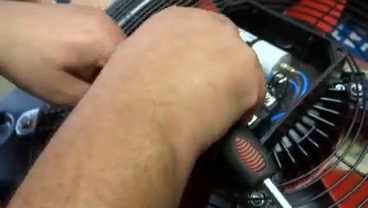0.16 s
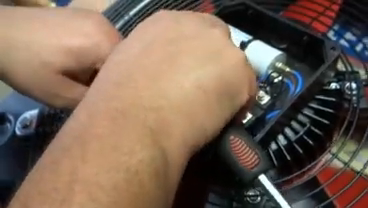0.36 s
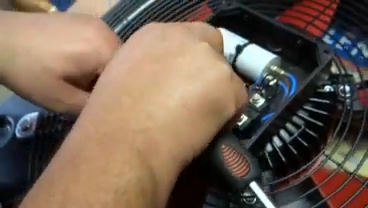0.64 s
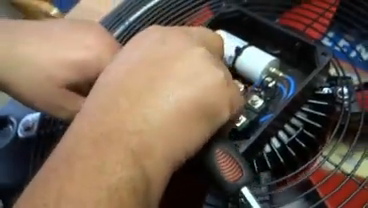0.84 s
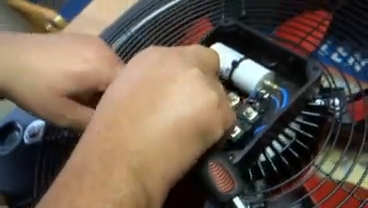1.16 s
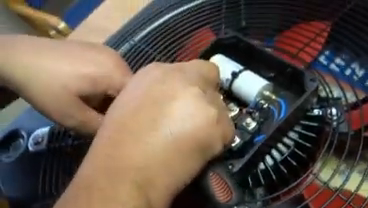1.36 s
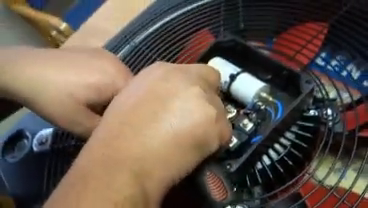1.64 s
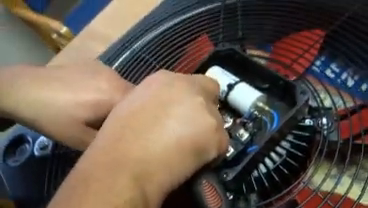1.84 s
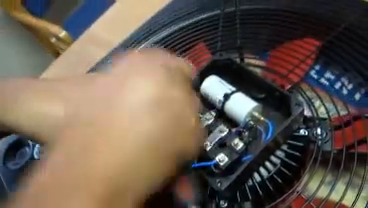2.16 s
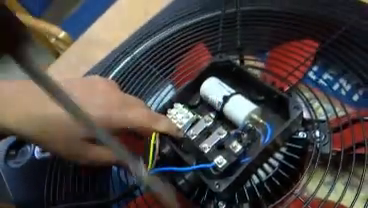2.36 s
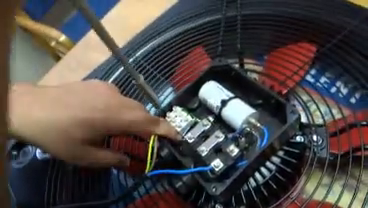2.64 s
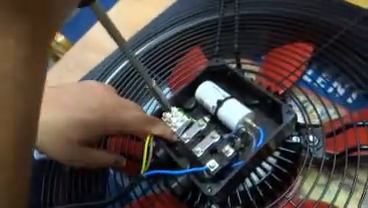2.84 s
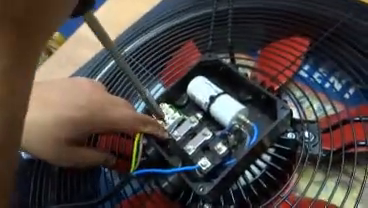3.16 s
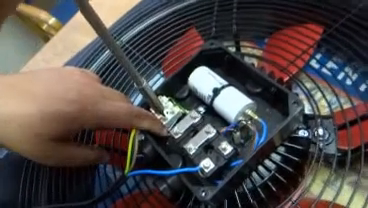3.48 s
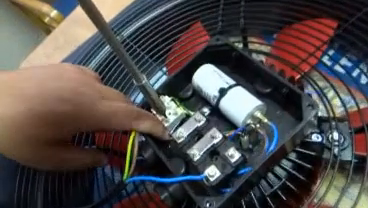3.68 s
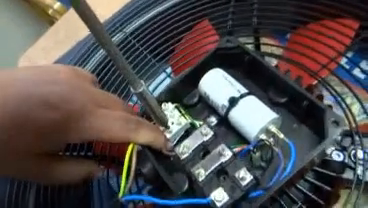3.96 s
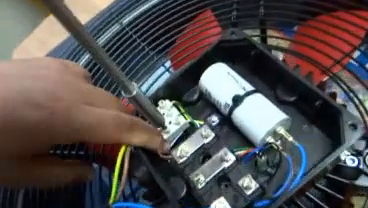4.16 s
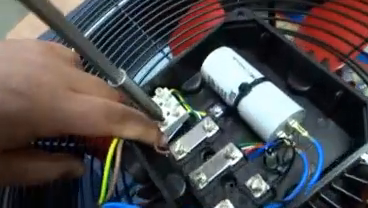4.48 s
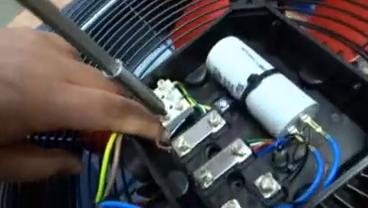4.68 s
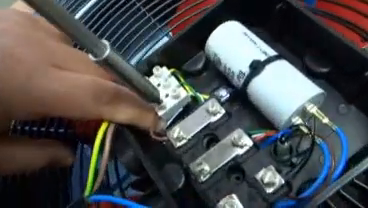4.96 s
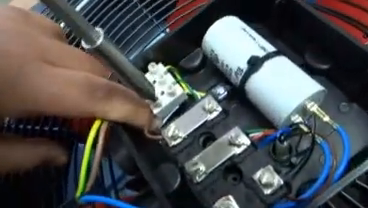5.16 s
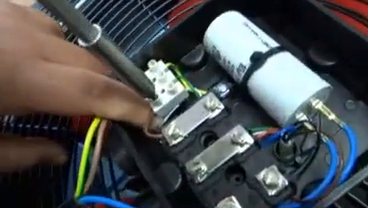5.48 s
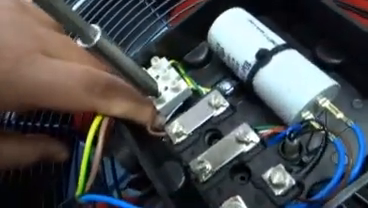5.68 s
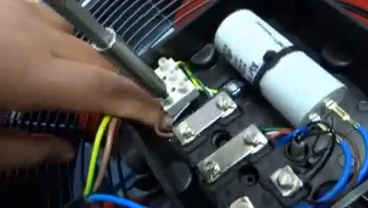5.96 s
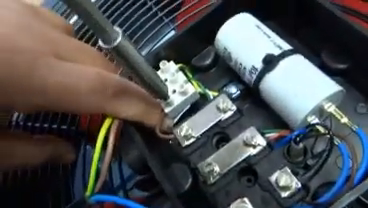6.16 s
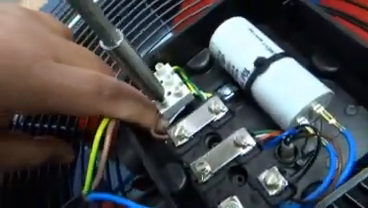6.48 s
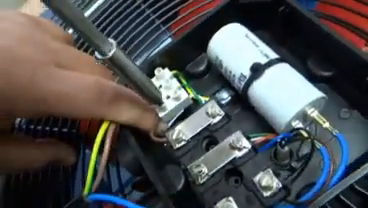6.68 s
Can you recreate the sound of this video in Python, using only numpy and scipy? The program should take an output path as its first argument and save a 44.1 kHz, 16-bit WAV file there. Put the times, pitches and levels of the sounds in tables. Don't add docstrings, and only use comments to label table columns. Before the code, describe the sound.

A screwdriver ticks, jumps out of a screw twice with loud clacks, then grinds and clicks in short turns above low steady machine rumble.

```python
import sys
import numpy as np
from scipy import signal
from scipy.fft import rfft, irfft, next_fast_len
from scipy.io import wavfile
from scipy.ndimage import uniform_filter1d

SR = 44100
rng = np.random.default_rng(int(sys.argv[2]) if len(sys.argv) > 2 else 0)


def attenuation_scalar(level_db):
    decades = np.asarray(level_db, float) / 20
    return 10 ** decades


def pcm_store(signal):
    levels = np.round(np.clip(np.atleast_2d(signal), -1, 1) * 32767)
    wavfile.write(sys.argv[1], SR, levels.astype(np.int16).T)


N = 300762

# start in seconds, peak in dB, brightest Hz, room tail in dB.
WIRE_TICKS = [(0.6949, -32.5, 7541, -5.5), (0.835, -53, 6500, -3), (1.0363, -36.5, 7974, -9),
              (1.0585, -49, 2002, -7.5), (1.013, -51.5, 1785, -6), (0.541, -53, 2193, 3),
              (1.354, -36.5, 9535, -13.5), (1.503, -44.5, 4973, -7), (1.555, -48, 4600, -9),
              (1.7874, -36.5, 9765, -7), (1.806, -41, 6100, -5), (1.8955, -40, 10250, -8.5),
              (1.9913, -38, 6204, -13), (2.0094, -47, 3200, -14), (2.144, -41.5, 9100, -0.5)]
# start in seconds, peak in dB, brightest Hz, room tail in dB.
SEAT_TICKS = [(3.1337, -41, 4300, -5.5), (3.136, -44.5, 2440, -9.5), (3.438, -54.5, 3400, -5),
              (3.451, -40, 3472, -9), (3.7141, -53, 3383, -6), (3.7135, -53, 7600, -15),
              (3.692, -49.5, 8600, -10), (3.785, -36, 8474, 0.5), (3.7945, -47, 6440, -1),
              (3.8626, -35, 3500, -6.5), (3.8646, -22, 4973, -1), (3.878, -16, 5161, -16),
              (3.8883, -23, 6329, -22), (3.896, -32.5, 5140, -17), (4.1361, -31, 8255, -10),
              (4.2362, -33, 3150, -8.5), (4.365, -31, 3830, -2.5), (4.3755, -26, 3950, -20),
              (4.391, -31, 7400, 0.5), (4.39, -37, 3800, -7), (4.5129, -32.5, 8600, -17),
              (4.5162, -36, 3800, -13), (4.5264, -36.5, 6540, -5.5)]
# start in seconds, peak in dB, brightest Hz, room tail in dB.
TURN_TICKS = [(4.7546, -45, 6600, -7.5), (4.8518, -30, 4728, -3), (4.8542, -26.5, 7800, -15.5),
              (4.8605, -28, 8034, -15), (4.9045, -29, 8300, -8), (4.9126, -29.5, 7771, -15),
              (4.9152, -28, 8600, -10), (4.948, -39, 8600, -7), (5.074, -41, 7883, 6.5),
              (5.192, -34.5, 3173, -1), (5.2032, -32.5, 8531, 1), (5.2255, -42.5, 6000, -15),
              (5.268, -38, 6604, -12), (5.546, -44, 7200, 11.5), (5.83, -51.5, 3100, -8),
              (5.8388, -30.5, 6530, -6), (5.8475, -31.5, 7162, -10.5), (5.857, -44, 4300, -12.5),
              (6.0377, -41.5, 9000, 4.5), (6.088, -45, 4016, 4), (6.1572, -31.5, 7700, -4.5),
              (6.1615, -41, 3060, -12), (6.179, -37, 4500, 1.5), (6.3625, -58.5, 8153, -12),
              (6.379, -32, 6690, -6), (6.4675, -46, 4900, -15), (6.4745, -32.5, 4783, -7),
              (6.4956, -38, 4540, -22), (6.5078, -31, 7046, -7), (6.5415, -47, 8000, -10),
              (6.6193, -52, 8110, 14.5), (6.794, -48, 4970, -9), (6.804, -51, 4980, -9)]
# frequency in Hz, width in Hz, level in dB.
SCREW, BLADE, TIP = [(2300, 590, 1), (3331.3, 1096, -9.5), (3737.5, 710, 1.5)], [(4700, 580, -10), (6100.4, 1004, -10.5)], [(6600, 1725, -1), (8600, 3300, 7), (10637, 4105, 1)]
# frequency in Hz, width in Hz, level in dB.
CLAMPED = [
    [(2200, 500, -13), (3180, 380, 0), (3950, 300, -9)],
    [(4720, 520, 0), (5300, 300, -4), (6200, 450, -9)],
    [(7170, 650, 0), (8600, 1000, 1), (10100, 1800, -3)],
]
TICK_MS, TICK_OCTAVES = 1.9, .68
BITE_MS, BITE_OCTAVES = .55, .95
REBOUND_MS, REBOUND_DB = 2.3, -9
LIGHT_DB, MS_PER_DB = -40, .11
RISE_MS, RISE_MS_PER_DB = 0.596, 1
FIRM_DB, OCTAVES_PER_DB = -30, .04

# start in seconds, length in seconds, level in dB, half of tip over screw in
# dB.
FUMBLES = [(0.987, 0.091, -74, -1), (1.08, 0.03, -74.5, 12), (1.32, 0.075, -73, 3),
           (1.495, 0.091, -70.5, 0), (1.752, 0.0608, -70, 6.5), (1.889, 0.0705, -65.5, 4.5),
           (1.93, 0.1252, -65.5, 3), (2.018, 0.3142, -70.5, 1.5), (2.294, 0.23, -72.5, 2),
           (2.5, 0.25, -73.5, 1), (3.435, 0.03398, -63, 0.5), (3.582, 0.4305, -66.5, -1),
           (3.7, 0.032, -75.5, 4.5), (3.786, 0.0322, -65.5, 11), (3.85, 0.023, -54, -1),
           (3.883, 0.027, -43.5, 2.5), (3.897, 0.067, -70.5, -4), (4.033, 0.22, -67.5, -0.5),
           (4.185, 0.2, -70.5, -1), (4.343, 0.022, -57.5, 2), (4.362, 0.028, -47, 5.5),
           (4.378, 0.0776, -73, 5), (4.51, 0.017, -55, 1.5)]
# start in seconds, length in seconds, level in dB, half of tip over
# screw in dB, blade in dB.
TURNS = [(4.748, 0.0422, -64.5, 5.5, 3), (4.83, 0.043, -64, 4, 0), (4.88, 0.0542, -62, 5.5, -1.5),
         (4.93, 0.02322, -54.5, 8, -7.5), (4.96, 0.058, -68, 4, -2.5), (5.064, 0.1912, -73, 1.5, -1),
         (5.193, 0.03205, -60, 2.5, 3), (5.22, 0.06042, -58.5, 8.5, 1), (5.285, 0.02462, -63.5, 6, -3),
         (5.34, 0.36, -71.5, 4, -2.5), (5.538, 0.06, -60, -0.5, -4.5), (5.61, 0.12, -81, -3, 0),
         (5.74, 0.0803, -73.5, 4, 2.5), (5.823, 0.04099, -57.5, 2, 1.5), (5.89, 0.06203, -66.5, 6, 2),
         (5.96, 0.049, -75, 8, 7), (6.03, 0.02448, -71.5, 9, -2), (6.07, 0.04793, -70, 8.5, 1),
         (6.14, 0.01846, -66, 4.5, 4), (6.158, 0.03, -58, -2, 0), (6.205, 0.05852, -64, 8, -2.5),
         (6.3, 0.036, -66, 5.5, -0.5), (6.36, 0.048, -68, 6, -0.5), (6.452, 0.0392, -63.5, 3, 2),
         (6.484, 0.0251, -58.5, 1, 6), (6.51, .025, -69, 8, -1), (6.535, 0.033, -65, 9, -6.5),
         (6.6, 0.0377, -65.5, 4.5, -8), (6.71, 0.069, -67, 4.5, -4), (6.785, 0.16, -59.5, 2, 2.5)]
LOOSE_BLADE_DB = -3.5
LOOSE_PEAKY_DB, LOOSE_WIDEN = 0.37, 1.4574
LOADED_PEAKY_DB, LOADED_WIDEN = 2.8, 1.6
WANDER, WANDER_S = .07, .06

# start in seconds, contact length in seconds, rms in dB.
CLACKS = [
    (3.8615, 0.00703, -28.5),
    (3.8758, 0.0053, -24.5),
    (4.3729, 0.0059, -24.5),
]
# frequency in Hz, width in Hz, level in dB.
SHAFT = [
    [(2481, 290, -9), (3865.4, 230, -5), (5030, 280, 1), (5830, 240, -11), (7205, 270, -12),
     (7550, 220, -14), (8782, 310, 1)],
    [(3396.5, 140, -9), (3800, 150, -3), (4818.3, 390, 0), (4966.5, 48, -6), (5816.8, 300, -6),
     (6400, 340, -3.5), (7835, 180, -1), (8510, 230, 0), (9600, 190, 1), (11000, 420, -1), (11500, 80, -28),
     (11800, 130, -27)],
    [(2470, 150, -11), (3810, 250, 3), (5140, 150, -8.5), (5690, 80, -14), (6160, 170, -3.5),
     (6940, 190, -11.5), (7530, 240, -5), (9000, 140, -6), (9455, 120, -17), (9844, 200, -9.5)],
]
CHATTER_DB = 4

# start in seconds, length in seconds, first Hz, last Hz, top level in dB.
SQUEALS = [(.44, .175, 6830, 6900, -73), (3.68, .132, 5960, 6030, -57), (4.05, .14, 6200, 6150, -63),
           (3.81, .045, 5700, 5610, -64), (4.172, .026, 5490, 5440, -59), (3.668, .115, 10120, 10000, -68),
           (3.775, .05, 9980, 10400, -69), (3.82, .04, 10400, 10230, -70), (3.535, .13, 9600, 11700, -75),
           (3.605, .065, 8500, 9500, -73), (4.148, .03, 5530, 5500, -70)]
SQUEAL_ENDS_DB = -6
SAG_HZ_PER_DB, QUIET_DB = 8.5, -73

# start in seconds, peak in dB, room tail in dB.
BUMPS = [(0.835, -46, -15), (1.353, -45, -5), (1.5036, -46, -7.5), (1.554, -50.5, -3), (1.65, -57, -12),
         (1.807, -48.5, -7), (2.234, -51, -20), (3.862, -38.5, 5.5), (3.878, -29.5, -4), (3.898, -33, -17),
         (4.237, -43, -9.5), (4.365, -31, -1.5), (4.375, -30.5, -10), (4.853, -41.5, -4), (5.846, -48, 1.5),
         (6.098, -50, -26.5), (6.161, -55, 9), (6.473, -45.5, -5)]
# frequency in Hz, width in Hz, level in dB.
BOX = [(568.18, 130, -0.5), (750, 296, 0), (1044, 51.96, -5), (1704.5, 233, -16.5), (1959.9, 93.2, -8.5)]
BUMP_MS, BUMP_OCTAVES = 2.4, 1.6
LID_HZ, LID_SCATTER = 612, 0.15
# start in seconds, level in dB, upper modes in dB.
LID_BLOWS = [
    (3.8775, -32.5, -5),
    (3.898, -41, -11),
    (4.3648, -32, 1),
    (4.3755, -34.5, -2),
    (4.2365, -48, 7.5),
]
# frequency in Hz, level in dB, 60 dB decay in seconds.
LID = [(563, -4.5, .06), (640, -0.5, .05), (778, -2, .045), (1156, -6.5, .06), (1380, -11.5, .14)]
# start in seconds, length in seconds, level in dB, slips per second.
RUBS = [(0.978, 0.12696, -66.5, 870), (1.133, 0.65, -73.5, 600), (1.487, 0.1409, -73, 602.3),
        (1.905, 0.02, -70, 220), (1.943, 0.054, -56, 830), (2.003, 0.21, -71, 627.3),
        (2.13, 0.3391, -75.5, 961.3), (3.621, 0.2523, -66.5, 1980), (3.9, 0.77, -65.5, 2200),
        (4.376, 0.3788, -71, 3300), (4.557, 0.2678, -74, 1200), (4.954, 0.13, -70, 1182.6),
        (5.199, 0.14127, -66.5, 1870), (6.646, 0.1604, -67, 1520)]
# start in seconds, level in dB.
JERKS = [(1.0343, -57.5), (1.058, -46), (1.068, -53), (1.5025, -43), (1.5114, -38.5), (1.5251, -42),
         (1.5546, -37.5), (1.5627, -43), (1.5684, -38.5), (1.5732, -50), (1.6143, -56), (1.6189, -49),
         (1.6255, -46), (1.6335, -37.5), (1.6488, -41.5), (1.9222, -42), (1.9451, -39), (1.9509, -38.5),
         (1.9566, -38), (1.9623, -34.5), (1.9675, -42), (1.9733, -34.5), (1.9798, -34.5), (1.987, -35),
         (1.9939, -34.5), (2.0038, -46), (2.0095, -33.5)]
JERK_DB = 11.5

KNOCK_S = [3.8805, 4.237, 4.376, 4.852, 3.135, 4.43]
# deep modes in dB, upper modes in dB, ring length factor.
KNOCKS = [
    (-26, -25.5, 1.22),
    (-41, -41, 0.617),
    (-23.5, -30.5, 1.26),
    (-43.5, -42.5, 2.2),
    (-42, -52, 1.105),
    (-41, -48, 0.47),
]
# frequency in Hz, level in dB, 60 dB decay in seconds.
CAGE = [(55.2, -1.5, 1), (104.69, -5, 1.0), (121.7, -0.5, 0.82), (149.5, -6, 0.99), (152, 10.5, 0.039),
        (625, -11.5, 0.3), (185.5, 3.5, 0.25), (250.5, 1.5, 0.29), (292, -9, 0.65), (559, -12, 0.038),
        (592, -19, 0.4), (708.6, -16.5, 0.18)]

# frequency in Hz, level in dB per Hz.
AIR = [(15, -40), (25, -7.5), (126, -1), (190, -2), (266, -5.5), (294, -6.5), (401, -9.5), (468, -20),
       (574, -16.5), (936, -25.5), (1090, -24.5), (1450, -33), (1920, -32), (6260, -39.5), (11600, -42.5),
       (15100, -102), (22000, -120)]
AIR_DB = -47
# frequency in Hz, correlation.
SAME = [(30, 1), (140, 1), (350, 0.85856), (840, 0.056), (2000, 0.1456), (4900, 0.62), (9000, 1),
        (11700, 0.9871)]
# frequency in Hz, width in Hz, level in dB.
HUM = [(61.62, 10, -79.5), (104.5, 23.4, -54.5), (330.22, 2.8, -63), (571.93, 9.106, -73.5),
       (1059.3, 89, -75), (9132.3, 1700, -76)]
MOTOR_HZ = 296.6
# time in seconds, level in dB.
MOTOR = [(0, -55), (0.8, -50.5), (1.5, -53), (2.4, -52.5), (3.4, -55), (4.2, -60.5), (5.2, -57),
         (6.002, -56), (6.82, -55)]

# frequency in Hz, 60 dB decay in seconds.
ROOM = [(200, 1), (700, 0.66), (2000, 0.8546), (5000, 0.5299), (10000, 0.3312)]
CLACK_ROOM_DB, STROKE_ROOM_DB = -24, -10
# frequency in Hz, gain in dB.
SHADE = [(28, -23.5), (75, 5), (300, 5.5), (9200, 0.5), (10200, -3.5), (11000, -8), (11800, -11),
         (12300, -32)]
# frequency in Hz, lead of the left in radians.
PORTS = [(0, 0.78), (1120, -0.47), (1720, -0.6), (4220, -0.451), (8440, -0.0625), (9820, -0.86),
         (11900, 0.15)]
# frequency in Hz, gain in dB.
MIC = [(12, -31.5), (22, 6), (40, -2), (11700, -1.5), (12100, -33), (12400, -55)]
TOP_BANDS_HZ, TOP_FLUTTER_DB, DROPPED_PERCENT = (11050, 11500), 1.6, (20, 34)


def ticks():
    return contacts(WIRE_TICKS + SEAT_TICKS, SCREW + BLADE + TIP, -6, 1, TICK_MS, TICK_OCTAVES, .045)


def bites():
    dry, sent = contacts(TURN_TICKS, sum(CLAMPED, []), -6, 1, BITE_MS, BITE_OCTAVES, .06, skid=.1)
    rebound = np.roll(dry, round(REBOUND_MS * SR / 1000), 1)
    return dry + attenuation_scalar(REBOUND_DB) * rebound, sent


def contacts(events, modes, peaky_db, aside, light_ms, light_octaves, damping, skid=1):
    dry, sent = np.zeros((2, N)), np.zeros((2, N))
    t, hz = np.arange(1024) / SR, np.fft.rfftfreq(1024, 1 / SR)
    body = 1.95 + sum(attenuation_scalar(db) / (1 + (2 * (hz - f) / w) ** 2) for f, w, db in modes)
    chance = rng.standard_normal((len(events), 2, 1024))
    for (s, db, top_hz, tail_db), (noise, uneven) in zip(events, chance):
        ms = light_ms + skid * MS_PER_DB * (db - LIGHT_DB)
        octaves = light_octaves + OCTAVES_PER_DB * max(db - FIRM_DB, 0)
        rise_s = max(RISE_MS + skid * RISE_MS_PER_DB * (db - LIGHT_DB), .2) / 1000
        rise = np.clip((t - .002) / rise_s, 0, 1)
        u = (t - .002) / (np.clip(ms, .5, 9) / 1000)
        fall = np.exp(-np.clip(u, 0, 9) ** 1.53 * 0.95)
        burst = noise * attenuation_scalar(5.112 * uneven) * rise * fall
        distance = abs(np.log2((hz + 1) / top_hz) / np.clip(octaves, .1, 2))
        hump = body * np.exp(-.5 * distance ** 2.4)
        wide = irfft(rfft(burst) * hump)
        main_mode = resonate(burst, top_hz, damping * top_hz)
        sound = evened(wide) + attenuation_scalar(peaky_db) * evened(main_mode)
        peak = abs(sound).max()
        add(dry, s - .002 - .001 * skid, panned(attenuation_scalar(db) * sound / peak, aside * hand_pan(s)))
        snap = np.roll(irfft(hump ** 2), 200)
        energy = np.linalg.norm(sound) / peak / np.linalg.norm(snap)
        add(sent, s - .003, panned(attenuation_scalar(db + tail_db) * energy * snap, 0))
    return dry, sent


def grinding(strokes, parts, peaky_db, widen):
    size = attenuation_scalar(peaky_db * np.minimum(rng.exponential(1, N), 4))
    slips = size * rng.standard_normal(N) * (rng.random(N) < 7000 / SR)
    judder = attenuation_scalar(0.63 * evened(uniform_filter1d(rng.standard_normal((3, N)), 260)))
    power = np.zeros((3, N))
    for s, length, db, tilt_db, blade_db in strokes:
        at, shape = swell(s, length)
        level = attenuation_scalar(db + np.array([-tilt_db, blade_db, tilt_db]))
        power[:, at] += (level[:, None] * shape) ** 2
    sound = sum(np.sqrt(p) * ring(slips * j, modes, widen) for p, j, modes in zip(power, judder, parts))
    return panned(sound, hand_pan(np.arange(N) / SR))


def ring(slips, modes, widen):
    slow = rng.standard_normal((2, len(modes), N // 100 + 2))
    rocking = attenuation_scalar(2.4 * evened(uniform_filter1d(uniform_filter1d(slow[0], 4), 4)))
    span = round(WANDER_S * SR / 100)
    drift = 1 + WANDER * evened(uniform_filter1d(uniform_filter1d(slow[1], span), span))
    own = rng.choice([-1., 1.], (len(modes), N)) * (rng.random((len(modes), N)) < .6)
    out, at = np.zeros(N), np.arange(N) / 100
    for (f, w, db), g, d, o in zip(modes, rocking, drift, own):
        mode_hz = f * np.interp(at, np.arange(len(d)), d)
        turn = np.exp(2j * np.pi * np.cumsum(mode_hz) / SR)
        r = np.exp(-np.pi * widen * w / SR)
        base = signal.lfilter([(1 - r) ** 2], [1, -2 * r, r * r], slips * o * turn.conj())
        gain = np.interp(at, np.arange(len(g)), g) * attenuation_scalar(db)
        out += gain * (turn * base).real
    return evened(out)


def swell(s, length):
    at = np.arange(round(s * SR), min(round((s + 1.4 * length) * SR), N))
    u = (at / SR - s) / length
    return at, np.clip(u / 0.21043, 0, 1) * np.clip((1.3 - u) / .5, 0, 1)


def clacks():
    out = np.zeros((2, N))
    for (s, length, db), modes in zip(CLACKS, SHAFT):
        t = np.arange(0, length, 1 / SR)
        tone = np.zeros(len(t))
        for f, _, mode_db in modes:
            chatter = evened(uniform_filter1d(rng.standard_normal(len(t)), size=40))
            tone += attenuation_scalar(mode_db + CHATTER_DB * chatter) * np.sin(2 * np.pi * (f * t + rng.random()))
        shape = np.sin(np.pi * (t / length) ** 0.92) ** 1.25
        add(out, s, panned(attenuation_scalar(db) * evened(tone) * shape, hand_pan(s)))
    return out


def squeals():
    out = np.zeros((2, N))
    tremble = evened(uniform_filter1d(rng.standard_normal((2, N)), 250))
    for s, length, first_hz, last_hz, top_db in SQUEALS:
        u = np.arange(0, length, 1 / SR) / length
        pitch, shake = tremble[:, round(s * SR):][:, :len(u)]
        sag_hz = SAG_HZ_PER_DB * max(top_db - QUIET_DB, 0) * abs(2 * u - 1) ** 2.4
        glide_hz = first_hz + (last_hz - first_hz) * u + sag_hz
        tone = np.sin(2 * np.pi * np.cumsum(glide_hz * (1 + 0.002 * pitch)) / SR)
        level = np.sqrt(2) * attenuation_scalar(top_db + SQUEAL_ENDS_DB * (2 * u - 1) ** 2 + 1.545 * shake)
        add(out, s, panned(tone * level * signal.windows.tukey(len(u), .15), 0.6))
    return out


def bumps():
    spots_hz = LID_HZ * (1 + LID_SCATTER * rng.uniform(-0.83, 1, len(BUMPS)))
    events = [(s, db, hz, tail_db) for (s, db, tail_db), hz in zip(BUMPS, spots_hz)]
    return contacts(events, BOX, 0.62, -0.521, BUMP_MS, BUMP_OCTAVES, 0.1)


def lid():
    out, t = np.zeros((2, N)), np.arange(SR // 4) / SR
    for s, db, upper_db in LID_BLOWS:
        modes = sum(attenuation_scalar(d + upper_db * (f > 1000) - 60 * t / t60) * np.sin(2 * np.pi * f * t)
                    for f, d, t60 in LID)
        add(out, s, panned(attenuation_scalar(db) * modes, 0))
    return out


def rubbing():
    slips, size = np.zeros(N), attenuation_scalar(5.77 * rng.standard_normal(N))
    unsteady = attenuation_scalar(1.6 * evened(uniform_filter1d(rng.standard_normal(N), 150)))
    for s, length, db, per_s in RUBS:
        at, shape = swell(s, length)
        count = np.floor(np.cumsum(per_s * unsteady[at]) / SR)
        slip_now = np.diff(count, prepend=0) > 0
        slips[at] -= attenuation_scalar(db) * shape * size[at] * slip_now * np.sqrt(SR / per_s)
    for s, db in JERKS:
        slips[round(s * SR)] -= attenuation_scalar(db + JERK_DB)
    slips -= uniform_filter1d(slips, 120)
    plate = sum(attenuation_scalar(db) * resonate(slips, f, w) for f, w, db in BOX)
    soft_plastic = signal.butter(N=4, Wn=2000, fs=SR, output="sos")
    return panned(attenuation_scalar(14.0) * signal.sosfilt(soft_plastic, plate), -.5)


def cage():
    out, t = np.zeros((2, N)), np.arange(SR) / SR
    for s, (deep_db, upper_db, longer) in zip(KNOCK_S, KNOCKS):
        ringing = np.zeros(SR)
        for f, db, t60 in CAGE:
            level = attenuation_scalar(db + (deep_db if f < 160 else upper_db) - 60 * t / (t60 * longer))
            ringing += level * np.sin(2 * np.pi * f * t) * (1 - .5 * np.exp(-t * f / 70.7))
        add(out, s, panned(attenuation_scalar(-6.5) * ringing, 0))
    rattle = evened(uniform_filter1d(uniform_filter1d(rng.standard_normal(N), 700), 700))
    return out * attenuation_scalar(2.2 * rattle)


def room(x):
    taps = np.zeros((2, SR))
    at = np.arange(250, SR - 20, 20)
    at = at + rng.integers(0, 20, (2, len(at)))
    np.put_along_axis(taps, at, rng.choice([-1., 1.], at.shape), 1)
    taps[1] = 1.0056 * taps[0] + 0.4903 * taps[1]
    hz, t, z = signal.stft(taps, SR, nperseg=256)
    tail = signal.istft(z * attenuation_scalar(-60 * t / read(ROOM, hz)[:, None]), SR, nperseg=256)[1]
    tail = tail / np.linalg.norm(tail, axis=1)[:, None]
    return signal.fftconvolve(x.mean(0)[None], tail, axes=1)[:, :N]


def workshop():
    frames, hz = N // 512 + 5, np.fft.rfftfreq(2048, 1 / SR)
    a, b, c, d, patches = rng.standard_normal((frames, 1025, 5)).T
    patches = evened(uniform_filter1d(uniform_filter1d(patches, 20, 0), 8, 1))
    same = np.clip(read(SAME, hz), -1, .992)[:, None]
    left = a + 1j * b
    right = same * left + np.sqrt(1 - same ** 2) * (c + 1j * d)
    z = np.array([left, right]) * attenuation_scalar(read(AIR, hz)[:, None] + 1.4 * patches)
    air = attenuation_scalar(AIR_DB) * evened(signal.istft(z, nperseg=2048, noverlap=1536)[1][:, :N])
    shake = rng.standard_normal(N + SR)
    drift = evened(resonate(shake, 0.29, 0.9125)[SR:])
    motor_level = np.sqrt(2) * attenuation_scalar(np.interp(np.arange(N) / SR, *np.transpose(MOTOR)))
    motor = motor_level * np.sin(2 * np.pi * np.cumsum(MOTOR_HZ + 0.65528 * drift) / SR)
    hum = sum(attenuation_scalar(db) * evened(resonate(resonate(shake, f, w), f, w)[SR:]) for f, w, db in HUM)
    return air + motor + hum


def evened(x):
    return x / np.sqrt(np.mean(x ** 2) + 1e-20)


def read(points, hz):
    f, value = np.transpose(points)
    return np.interp(np.log(hz + 1), np.log(f + 1), value)


def add(mix, s, sound):
    part = mix[:, round(s * SR):][:, :sound.shape[1]]
    part += sound[:, :part.shape[1]]


def panned(x, pan_db):
    return np.array([x * attenuation_scalar(pan_db / 2), x * attenuation_scalar(-pan_db / 2)])


def hand_pan(s):
    return np.interp(s, [2.5, 3.2, 4.7], [-.2, 1.2, 3.5])


def resonate(x, hz, width):
    pole = np.exp((2j * np.pi * hz - np.pi * width) / SR)
    return 2 * signal.lfilter([1 - abs(pole)], [1, -pole], x).real


def colour(x, points, lead=((1, 0), (2, 0))):
    size = next_fast_len(N + 4096)
    hz = np.fft.rfftfreq(size, 1 / SR)
    turn = np.exp(.5j * read(lead, hz))
    return irfft(rfft(x, size) * attenuation_scalar(read(points, hz)) * np.array([turn, 1 / turn]), size)[:, :N]


def narrowed(x):
    hz, t, z = signal.stft(x, SR, nperseg=2048, noverlap=1024)
    power = (abs(z) ** 2).mean(0) + 1e-20
    top = power[hz > TOP_BANDS_HZ[0]].sum(0)
    treble = power[(hz > 2000) & (hz < TOP_BANDS_HZ[0])].sum(0)
    top_db = 10 * np.log10(top / treble)
    top_db = np.maximum(top_db, np.median(top_db) - 4) + TOP_FLUTTER_DB * rng.standard_normal(len(t))
    keep = np.ones(z.shape[1:])
    for band_hz, percent in zip(TOP_BANDS_HZ, DROPPED_PERCENT):
        keep *= (hz[:, None] < band_hz) | (top_db > np.percentile(top_db, percent))
    return signal.istft(z * keep, SR, nperseg=2048, noverlap=1024)[1][:, :N]


def scene():
    tick, tick_sent = ticks()
    bite, bite_sent = bites()
    bump, bump_sent = bumps()
    loose = [stroke + (LOOSE_BLADE_DB,) for stroke in FUMBLES]
    strokes = grinding(loose, (SCREW, BLADE, TIP), LOOSE_PEAKY_DB, LOOSE_WIDEN)
    strokes = strokes + grinding(TURNS, CLAMPED, LOADED_PEAKY_DB, LOADED_WIDEN) + rubbing()
    blows = clacks()
    sent = attenuation_scalar(CLACK_ROOM_DB) * blows + attenuation_scalar(STROKE_ROOM_DB) * strokes + tick_sent + bite_sent + bump_sent
    work = tick + bite + bump + strokes + blows + lid() + cage() + room(sent)
    return colour(work, SHADE, PORTS) + squeals() + workshop()


def band_limit(x):
    return signal.sosfilt(signal.butter(12, 12340, fs=SR, output="sos"), x)


def record(dry):
    mix = narrowed(colour(dry, MIC))
    return band_limit(mix)


dry = scene()
out = record(dry)
pcm_store(out)
```